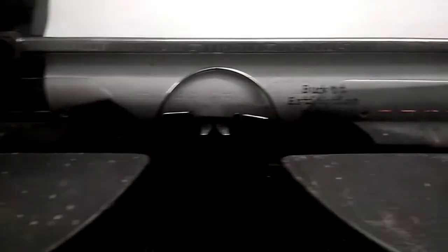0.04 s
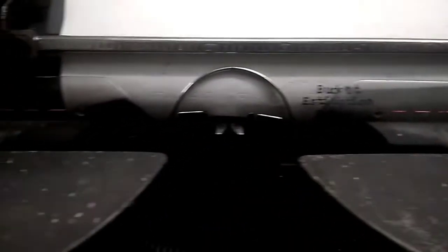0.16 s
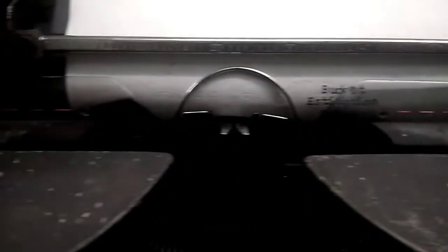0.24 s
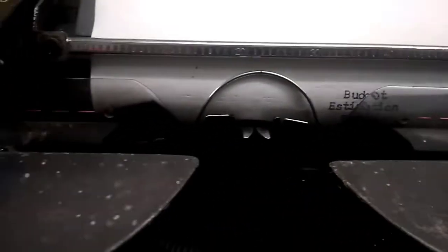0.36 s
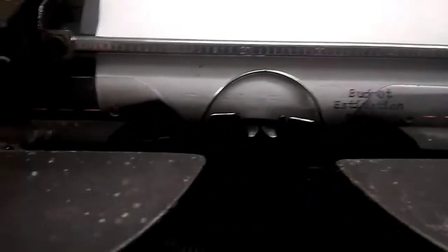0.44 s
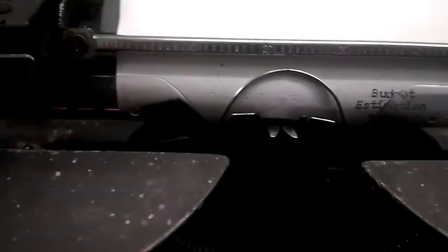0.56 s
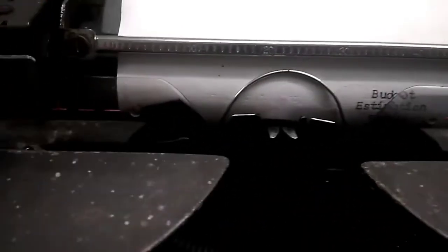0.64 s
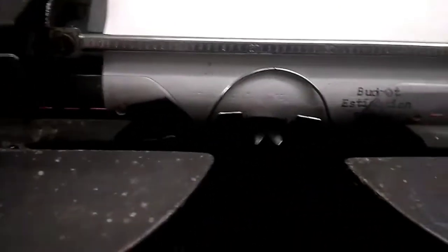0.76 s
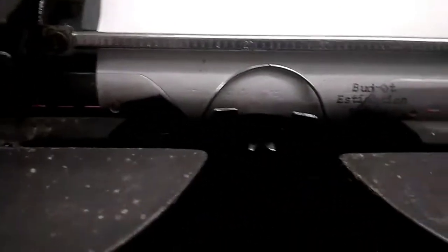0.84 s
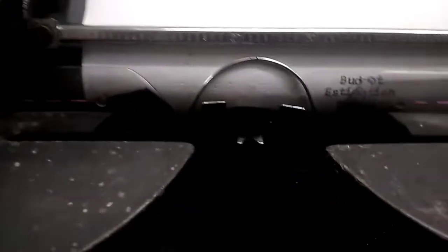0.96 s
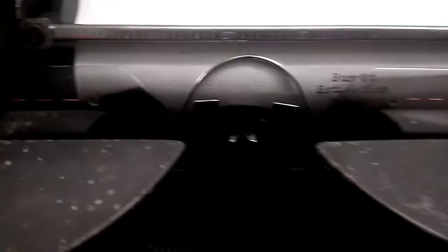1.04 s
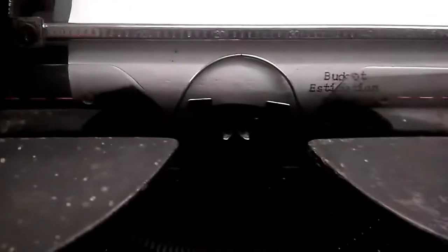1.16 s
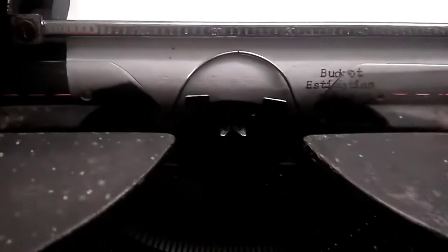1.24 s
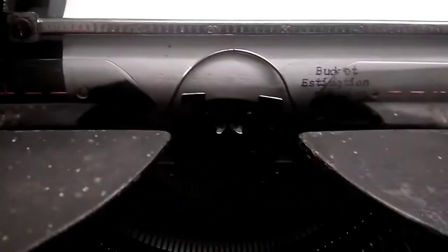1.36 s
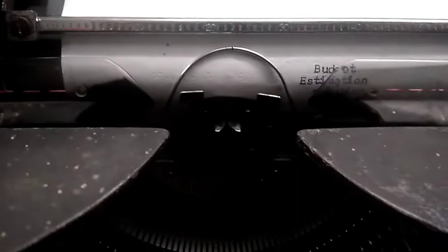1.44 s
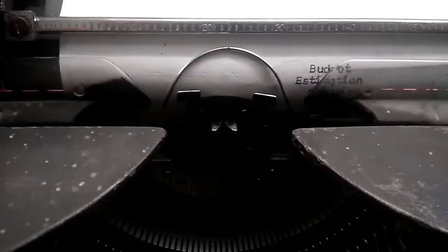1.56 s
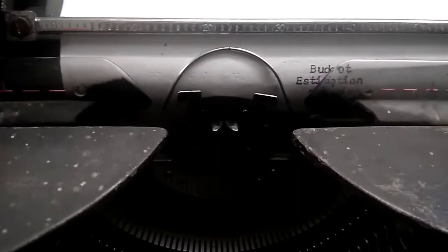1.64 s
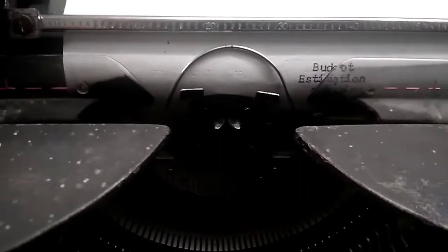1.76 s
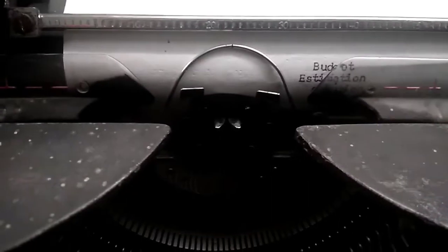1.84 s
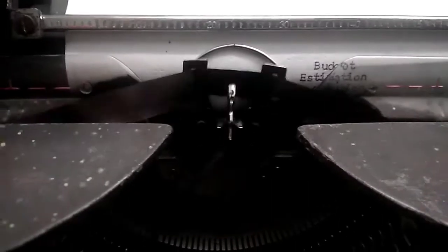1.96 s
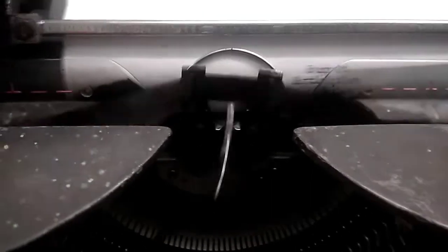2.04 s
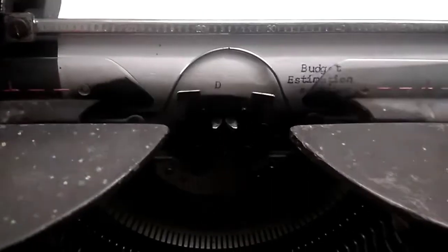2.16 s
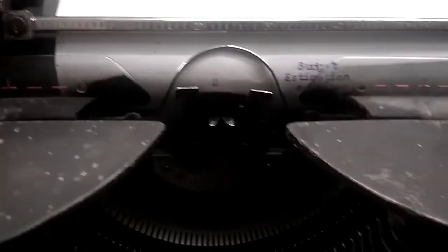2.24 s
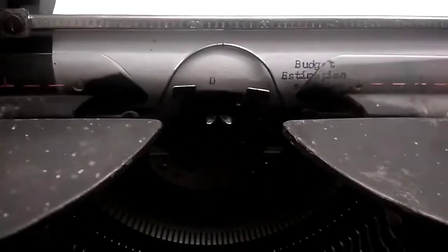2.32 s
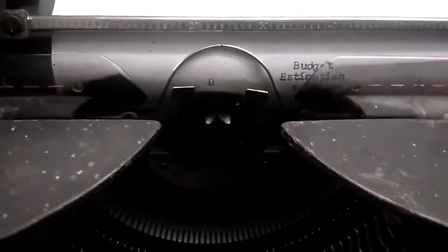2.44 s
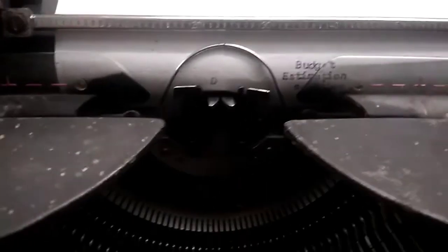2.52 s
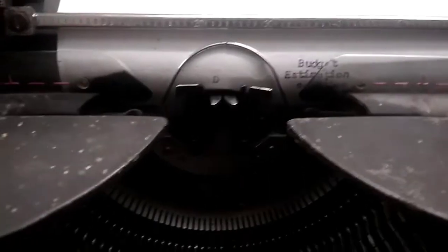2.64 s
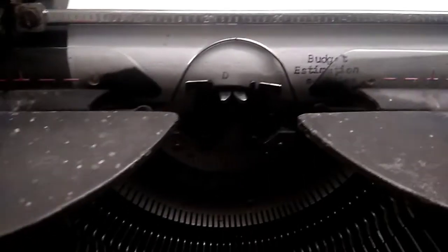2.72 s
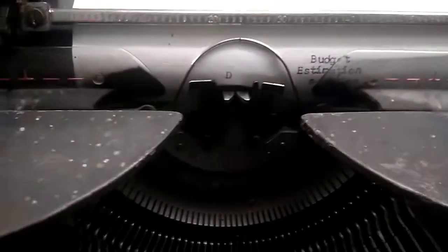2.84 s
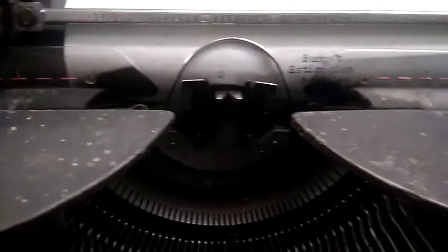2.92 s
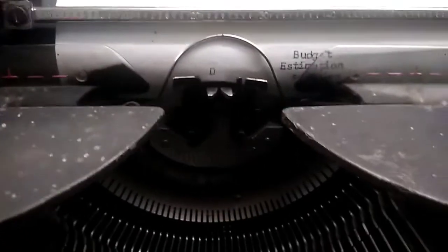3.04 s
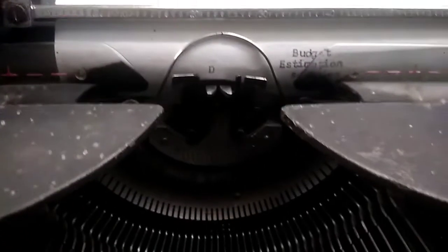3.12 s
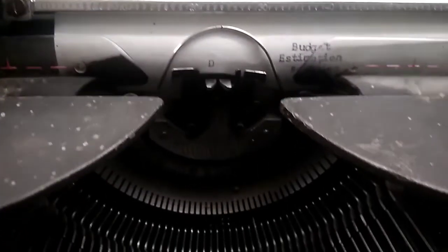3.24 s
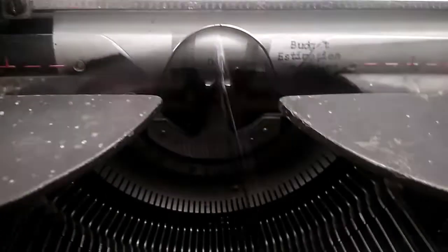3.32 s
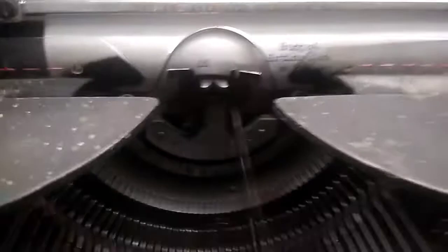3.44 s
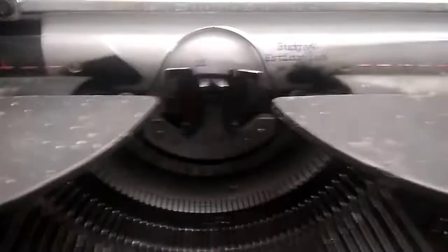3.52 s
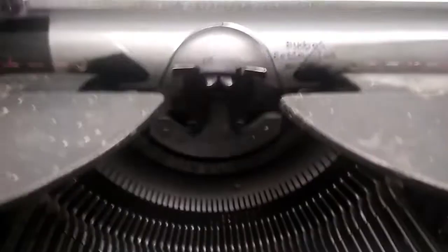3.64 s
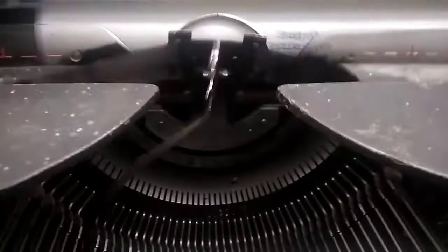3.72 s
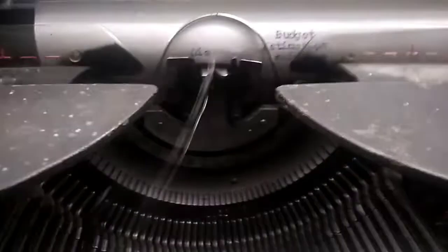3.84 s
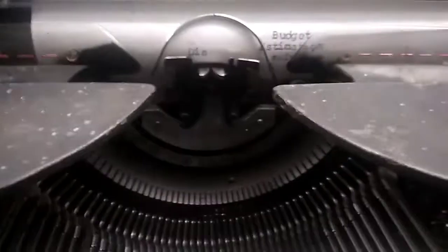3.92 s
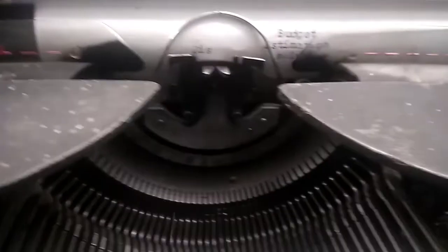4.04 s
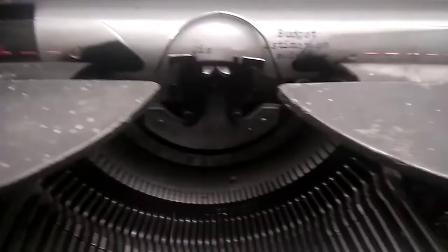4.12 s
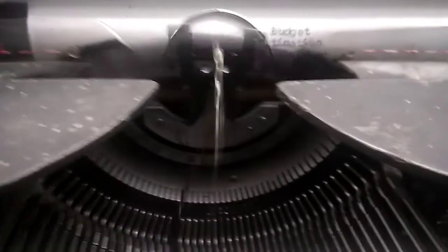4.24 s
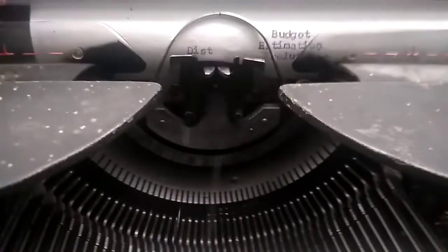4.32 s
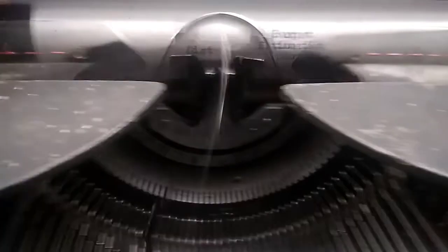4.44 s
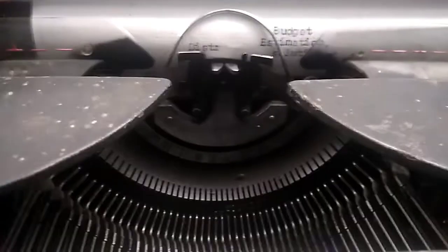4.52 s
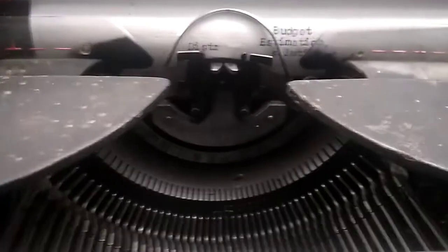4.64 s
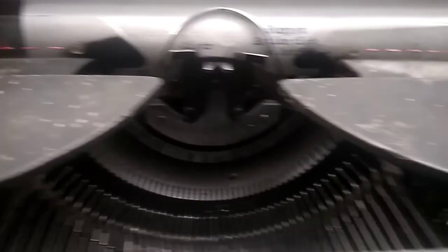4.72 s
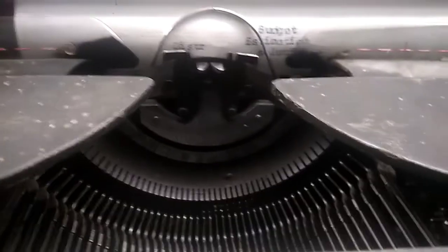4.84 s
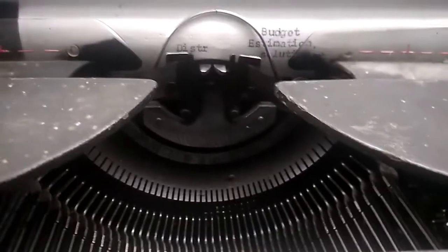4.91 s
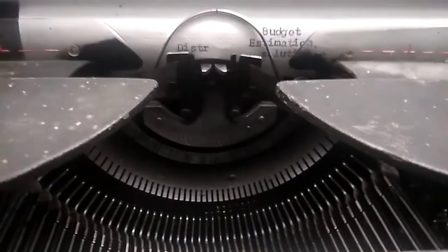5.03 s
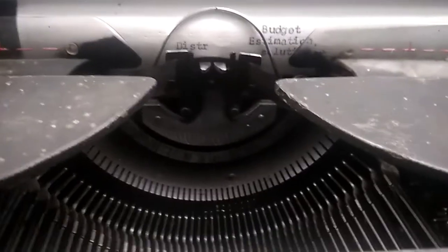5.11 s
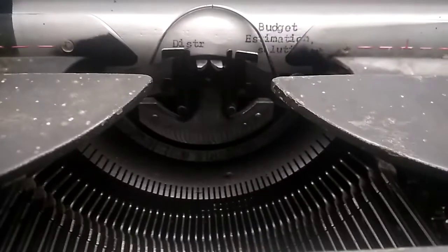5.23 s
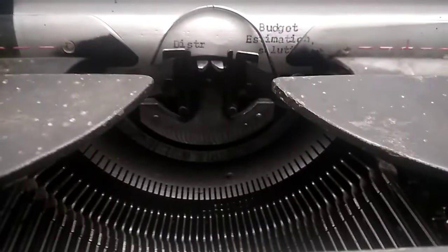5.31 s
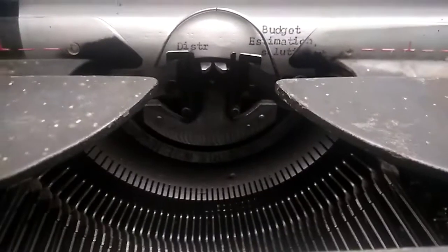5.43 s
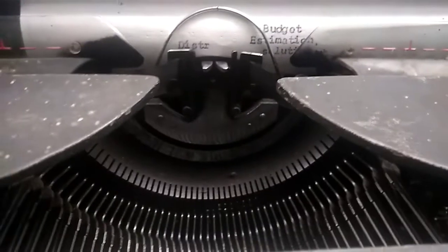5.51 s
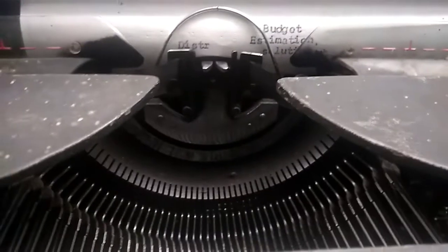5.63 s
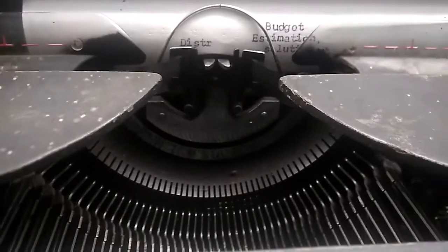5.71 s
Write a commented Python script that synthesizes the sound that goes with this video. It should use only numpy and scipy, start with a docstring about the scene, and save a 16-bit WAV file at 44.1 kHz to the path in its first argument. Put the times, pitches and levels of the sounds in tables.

```python
"""A manual typewriter on a desk in a quiet room, the microphones close by. Ventilation hums softly from the
left throughout, with faint far hums and knocks. The shift key clunks down, one letter is struck, the shift key
clunks up, then four letters follow faster. For each letter the linkage rattles, the typebar slaps the platen,
the carriage steps with a thud through frame and desk, and the bar drops back. Chatter is shaped noise, the
struck bodies are decaying modes, and the room answers briefly; a last low ring lingers."""
import sys
import numpy as np
from scipy import signal
from scipy.fft import rfft, irfft, next_fast_len
from scipy.io import wavfile
from scipy.ndimage import uniform_filter1d, map_coordinates

SR = 44100
rng = np.random.default_rng(int(sys.argv[2]) if len(sys.argv) > 2 else 0)


def persist_wave(psi):
    """Save psi, clipped to +-1, as 16-bit WAV."""
    counts = np.round(np.clip(psi, -1, 1) * 32767).astype(np.int16)
    wavfile.write(sys.argv[1], SR, np.atleast_2d(counts).T)


N = 254456

# letters: [slug on the platen t/s, slap level/dB, left re right/dB, overload re slap/dB,
#  bar enters the guide t/s, level/dB, chatter at the slap level/dB, its t60/ms,
#  bar rebounds t/s, level/dB, blow to the frame at the slap/dB, at the rebound/dB]
LETTERS = [(1.9873, -14, 6.5, -7, 1.9779, -14.5, -12, 24, 2.01, -17, -22.5, -33),
           (3.4171, -5, 4.5, -24, 3.408, -14, -13.5, 19, 3.4372, -17, -29, -27),
           (3.805, -4.5, 1.5, -29.5, 3.794, -18, -14, 15, 3.8267, -19, -37, -27),
           (4.243, -9, -0.5, -26, 4.2315, -18, -15, 30, 4.2622, -16.5, -36, -27),
           (4.48, -7.5, 0, -26.5, 4.468, -19, -15.5, 45, 4.503, -20, -40, -24)]
# carriage steps as a key is let go: [t/s, blow level/dB, click level/dB,
#  settling blow t/s, level/dB, bounce on the feet re blow/dB]
CARRIAGE_STEPS = [(2.18, -25.5, -31, 2.219, -29, -18), (3.487, -23.5, -34, 3.52, -29, -12),
                  (3.874, -23, -33, 3.919, -34, -10.5), (4.312, -23.5, -28, 4.339, -30.5, -11),
                  (4.55, -23, -27, 4.574, -27, -12.5)]
# typebar back in its basket: [first touch t/s, level/dB, landing t/s, level/dB]
BAR_RETURNS = [(2.2464, -18.5, 2.2601, -9.5), (3.5689, -18, 3.5758, -7.5), (3.9642, -19.5, 3.9764, -11),
               (4.3987, -20, 4.4021, -14), (4.5533, -20, 4.573, -12.5)]


def linkage():
    """Every contact is a short chatter of tiny steel impacts, bright with a duller part; loose parts rustle between."""
    # bright part of the contacts: [f/Hz, level/dB]
    bright_spectrum = [(1760, -39), (3000, -20), (3400, -24.5), (3830, -14), (4110, -17), (5750, -6.5),
                       (6860, -9.5), (8700, -2.5), (9660, -0.5), (10100, -4.5), (11000, -10.5),
                       (14200, -12.5), (16000, -22)]
    # dull part of the contacts: [f/Hz, level/dB]
    dull_spectrum = [(300, -43.5), (700, -9.5), (1100, -4.5), (1500, -3), (2300, -1.5), (3200, -4.5),
                     (4500, -10.5), (8000, -34)]
    # resonances of the steel levers: [f/Hz, width/Hz, level/dB]
    lever_modes = [(5450, 110, -11.5), (8580, 41, -4.5), (8860, 50, -1), (9850, 630, -5.5),
                   (10740, 200, -1.5), (11500, 280, -7), (12300, 93, -5), (13800, 39, -10.5)]
    pan_scatter_db = 2

    time = np.arange(N) / SR
    grit_db = 2 * wobble(40) + 4 * np.maximum(wobble(300), 0)  # lumps and ticks
    bright, dull = (np.tile(level * amp(grit_db - 1), (2, 1)) for level in rustle())
    t = time[:SR // 4]
    for s, db, dull_db, rise_ms, t60_ms in contacts():
        pan_db = pan_scatter_db * rng.standard_normal()
        pan_pair_db = np.array([[pan_db], [-pan_db]]) / 2
        shape = fade(t, t60_ms / 1000, max(rise_ms, .1) / 1000)
        shape = amp(db - 7.5 + pan_pair_db) * shape / shape.max()
        add(bright, s, shape)
        add(dull, s, amp(dull_db) * shape)

    # other small parts take the blows from moment to moment, so the fine colour keeps changing
    steel = patchy(hiss(bright_spectrum, [(5000, .05)]), depth_db=3.0, size=3, span=3)
    body = patchy(hiss(dull_spectrum, [(600, .4), (1400, -0.14), (4000, -0.036)]), depth_db=4, size=3, span=3)
    flicker = amp(2.17 * np.array([wobble(700), wobble(700)]))
    chatter = flicker * bright * steel

    def levers(f):
        """A direct path plus one resonance for each lever mode."""
        return 0.91 + sum(amp(db) * 1j * f * w / (c * c - f * f + 1j * f * w) for c, w, db in lever_modes)

    return filtered(chatter, levers) + dull * body


def contacts():
    """Steel meets steel with a hardness and chatter of its kind: [t/s, level/dB, duller part/dB, rise/ms, t60/ms]."""
    # small ticks of key levers and bouncing bars: [t/s, level/dB, t60/ms]
    lever_ticks = [(0.7978, -43, 39), (0.811, -30, 15), (1.918, -33, 80), (1.941, -34, 28),
                   (1.961, -30.5, 150), (2.1658, -43, 130), (2.2104, -22, 60), (2.3256, -23.5, 19),
                   (3.3563, -33.5, 57), (3.368, -35.5, 74), (3.3787, -31, 38), (3.7295, -27, 35),
                   (3.7448, -22, 25), (3.7575, -27.5, 60), (3.786, -34, 60), (4.0709, -18.5, 14),
                   (4.0994, -38, 30), (4.1773, -35, 31), (4.1981, -31, 56), (4.221, -28, 25),
                   (4.227, -26, 30), (4.372, -24, 30), (4.46, -30, 20)]
    # clatter of the shift key, down and up: [t/s, level/dB, duller part re level/dB]
    shift_clatter = [(0.9303, -28.5, -2), (0.9383, -22.5, -3), (0.948, -25.5, -5.5), (0.957, -30, -3),
                     (2.607, -23, -16.5), (2.6115, -19.5, -13.5), (2.6227, -22, -11), (2.6294, -21, -3.5),
                     (2.638, -27, 1), (2.648, -29, 2.5)]
    # each kind: duller part in dB, rise in ms, t60 in ms (the slap's t60 comes with its letter)
    guide, slap, rebound = (-9, 1.8, 48), (6, .7), (-5, 1.1, 38)
    pawl, touch, land = (-4, 1.5, 45), (-13, 1.6, 45), (-11, .6, 16)
    tick_dull_db, tick_rise_ms = -16, 1.3
    shift_rise_ms, shift_t60_ms = .9, 38

    rows = [(s, db, tick_dull_db, tick_rise_ms, t60_ms) for s, db, t60_ms in lever_ticks]
    rows += [(s, db, dull_db, shift_rise_ms, shift_t60_ms) for s, db, dull_db in shift_clatter]
    for s, _, _, _, guide_s, guide_db, chatter_db, t60_ms, back_s, back_db, *_ in LETTERS:
        rows.append((guide_s, guide_db, *guide))
        rows.append((s - .001, chatter_db, *slap, t60_ms))
        rows.append((back_s, back_db, *rebound))
    rows += [(s, click_db, *pawl) for s, _, click_db, *_ in CARRIAGE_STEPS]
    for s, db, land_s, land_db in BAR_RETURNS:
        rows += [(s, db, *touch), (land_s, land_db, *land)]
    return rows


def rustle():
    """Bright and dull envelopes of loose parts, shaken anew by each swing, slap, step and landing; powers add."""
    # bright dB, dull dB, rise s, bright t60 s, dull t60 s
    after_slap = (-38.5, -39, .012, .8, .38)
    after_step = (-39, -36, .015, .45, .28)
    after_land = (-47, -58, .012, .42, .2)
    swing_db = np.array([[-36], [-48]])  # bright and dull, as the bar reaches the guide
    swing_db_per_s = 1300  # the bar's rattle grows on its way up
    settle_t60_s = .12  # what the slap shook comes to rest once the bar has landed

    power, t = np.zeros((2, N)), np.arange(SR // 2) / SR

    def shake(bright_db, dull_db, rise, bright_t60, dull_t60):
        """Loose parts set going by one blow."""
        return np.array([amp(bright_db) * fade(t, bright_t60, rise), amp(dull_db) * fade(t, dull_t60, rise)])

    before = t[:SR // 16][::-1]  # seconds left until the guide
    for letter, step, fall in zip(LETTERS, CARRIAGE_STEPS, BAR_RETURNS):
        slap_s, guide_s, step_s, land_s = letter[0], letter[4], step[0], fall[2]
        add(power, guide_s - before[0], amp(swing_db - swing_db_per_s * before) ** 2)
        rest = amp(-60 * np.maximum(slap_s + t - land_s, 0) / settle_t60_s)
        add(power, slap_s, (rest * shake(*after_slap)) ** 2)
        add(power, step_s, shake(*after_step) ** 2)
        add(power, land_s, shake(*after_land) ** 2)
    return np.sqrt(power)


def platen():
    """The slug's slap rings roller and paper; the right microphone overloads at the slap, leaving a slow low step."""
    # roller and paper modes: [f/Hz, level/dB, t60/s]
    roller_modes = [(675, -6, 0.054), (936, -1.5, .03), (1439, -6.5, 0.026), (1640, -4.5, 0.018),
                    (1818, -2, 0.041), (2180, -3.5, 0.014), (2390, -3, 0.071), (2970, -3.5, 0.025),
                    (3180, -2.5, 0.037), (3517, -2.5, 0.03)]
    out, t = np.zeros((2, N)), np.arange(SR // 6) / SR
    u = 2 * np.pi * 2500 * t
    # one swing each way, partly opposed at the two microphones
    slap = 7 * (1 - u) * np.exp(-u) * np.array([[1], [-.4]])
    for s, db, pan_db, overload_db, *_ in LETTERS:
        pan_pair_db = np.array([[pan_db], [-pan_db]]) / 2
        body = ring(roller_modes, t, .0003, scatter_db=1.5, turns_per_khz=.3)
        add(out, s, amp(db - 12.5 + pan_pair_db) * (body + slap))
        overload = fade(t, .12, rise=.0008) * np.cos(2 * np.pi * 14 * t)
        add(out[1], s, -amp(db + overload_db) * overload)
    return out


def carriage():
    """Soft heavy blows ring the frame, the feet and the desk and give a dull puff."""
    # typewriter frame: [f/Hz, level/dB, t60/s]
    frame_modes = [(321.5, -5, 0.15), (359.1, 3, 0.14), (422, -5, .15), (560, -5.5, 0.069),
                   (689.4, -4.5, 0.13)]
    # the machine bouncing on its feet: [f/Hz, level/dB, t60/s]
    feet_modes = [(120.4, 1, 0.21)]
    # desk under it: [f/Hz, level/dB, t60/s]
    desk_modes = [(62, -8.5, 0.13), (96, 3, .22), (163, 0, .2), (210, -5.5, .15), (265, -1.5, 0.12)]
    # dull puff: [f/Hz, level/dB]
    puff_spectrum = [(12, -40), (30, -19.5), (70, -4.5), (200, -4), (500, -3.5), (800, -7.5), (1300, -15.5),
                     (3000, -45.5)]
    out, puff, t = np.zeros((2, N)), np.zeros(N), np.arange(SR // 4) / SR
    for s, db, feet_db, desk_db, puff_db in blows():
        frame = ring(frame_modes, t, .003, scatter_db=2, turns_per_khz=.2)
        feet = ring(feet_modes, t, .008, scatter_db=0.65, turns_per_khz=.3)
        desk = ring(desk_modes, t, .003, scatter_db=1.5, turns_per_khz=.4)
        add(out, s, amp(db - 6) * (frame + amp(feet_db + 11.5) * feet + amp(desk_db + 8) * desk))
        add(puff, s, amp(db + puff_db - 3.5) * fade(t, 0.079, rise=.002))
    out += puff * hiss(puff_spectrum, [(25, .3), (80, 1.0), (800, .5)])
    return out * amp([[2.2], [-2.2]])  # heavier on the left


def blows():
    """Each heavy blow shares its force among the bodies: [t/s, frame level/dB, feet, desk, puff re frame/dB]."""
    # heavy blows of the shift key: [t/s, frame level/dB, desk re frame/dB]
    shift_blows = [(0.932, -31, -2), (0.955, -34, 0), (1.004, -41.5, -4), (2.631, -29.5, -4),
                   (2.659, -38.5, -3)]
    # the desk rocks: [t/s, frame level/dB]
    desk_rocks = [(1.063, -46), (1.154, -55), (2.355, -48), (2.749, -49), (2.839, -52), (4.741, -55)]
    # feet, desk and puff in dB re frame
    at_slap, at_rebound = (-30, -24, 3), (-20, -21, -8)
    at_land, at_rock = (-13, -13, -3), (-5, 1.5, -5)
    at_step, at_settle = (-25, -2), (-17.5, -2)  # desk and puff only
    shift_feet_db, shift_puff_db = -7, -1
    settle_feet_db = 3  # the settling blow bounces the feet more
    land_blow_db = -36

    rows = [(s, db, shift_feet_db, desk_db, shift_puff_db) for s, db, desk_db in shift_blows]
    rows += [(s, db, *at_rock) for s, db in desk_rocks]
    for s, *_, back_s, _, slap_db, back_db in LETTERS:
        rows += [(s, slap_db, *at_slap), (back_s, back_db, *at_rebound)]
    for s, db, _, settle_s, settle_db, feet_db in CARRIAGE_STEPS:
        rows.append((s, db, feet_db, *at_step))
        rows.append((settle_s, settle_db, feet_db + settle_feet_db, *at_settle))
    return rows + [(land_s, land_blow_db, *at_land) for _, _, land_s, _ in BAR_RETURNS]


def room(x):
    """Each frequency dies at its own speed; the tail differs from moment to moment."""
    # reverberation: [f/Hz, t60/s]
    room_t60 = [(100, 0.62), (500, 0.24), (3000, 0.28), (9000, 0.32), (15000, 0.27)]
    out, step = np.zeros((2, N)), SR // 5  # a new tail every 0.2 s
    for k in range(0, N, step):
        hz, t, z = signal.stft(rng.standard_normal((2, SR // 2)), SR, nperseg=256)
        decay = amp(-60 * t / along(room_t60, hz)[:, None])
        tail = signal.istft(z * decay, SR, nperseg=256)[1]
        tail = tail / np.linalg.norm(tail[0])
        add(out, k / SR + .004, signal.fftconvolve(x[:, k:k + step], tail, axes=1))
    return out


def room_tone():
    """Patchy ventilation noise over smooth microphone hiss, with decaying low tones and far knocks."""
    # ventilation: [f/Hz, level/dB]
    air_spectrum = [(12, -42.5), (20, -11.5), (91, -1.5), (134, -18), (170, -1.5), (256, -4), (279, -13.5),
                    (459, -8.5), (558, -10), (878, -6), (1040, -17.5), (1140, -9.5), (1610, -17.5),
                    (2320, -18), (3500, -31.5), (4550, -61), (7700, -120)]
    # ventilation over time: [t/s, level/dB]
    air_level = [(0.0, -55.5), (2.0, -58.5), (3.6, -56), (5.77, -58)]
    # microphone hiss: [f/Hz, level/dB]
    mic_spectrum = [(1760, -31.5), (3000, 0), (3150, -3), (5750, -9), (9530, -1.5), (12500, -15),
                    (15100, -17.5), (16000, -23.5)]
    # likeness of left and right: [f/Hz, correlation]
    air_likeness = [(60, 0.94), (240, 0.84), (950, 0.48), (3770, -0.1), (15000, -0.01)]
    # lean to the left: [f/Hz, left re right/dB]
    left_lean = [(60, 5.5), (380, 5.5), (2380, 2.5), (15000, 5.5)]
    # low hums in the building, and a long low ring after the last letter: [t/s, level/dB, f/Hz, t60/s]
    low_tones = [(0.03, -47, 250, 0.11), (0.109, -43.5, 196, 0.12), (0.549, -45.5, 168, 0.22),
                 (0.611, -46.5, 200, 0.14), (0.67, -47, 185, 0.12), (0.741, -45.5, 198, 0.1),
                 (4.78, -53.5, 212, 2.4)]
    # faint far knocks: [t/s, level/dB]
    far_knocks = [(0.222, -46), (3.052, -52)]
    # what a knock rings: [f/Hz, level/dB, t60/s]
    knock_modes = [(740, 0.5, .1), (874, -0.5, .1), (1296, -3.5, .09), (1470, -6, .09)]

    s, db = np.transpose(air_level)
    level = amp(np.interp(np.arange(N) / SR, s, db))
    air = level * patchy(hiss(air_spectrum, air_likeness), depth_db=2.5, size=4, span=6)
    air += amp(-70) * hiss(mic_spectrum, air_likeness)
    t = np.arange(SR) / SR
    for s, db, hz, t60 in low_tones:
        add(air, s, amp(db) * fade(t, t60, rise=0.0063) * np.sin(2 * np.pi * hz * t))
    for s, db in far_knocks:
        add(air, s, amp(db) * ring(knock_modes, t, .006, scatter_db=1.5, turns_per_khz=.1))
    return filtered(air, lambda hz: amp(along(left_lean, hz) * np.array([[.5], [-.5]])))


def ring(modes, t, rise, scatter_db, turns_per_khz):
    """Modes at new strengths; higher modes reach the two microphones more out of step."""
    draw = rng.standard_normal((len(modes), 3))  # strength, left phase, right phase
    out = 0
    for (hz, db, t60), d in zip(modes, draw):
        turns = hz * t + turns_per_khz * hz / 1000 * d[1:, None]
        out = out + amp(db + scatter_db * d[0]) * fade(t, t60, rise) * np.sin(2 * np.pi * turns)
    return out


def hiss(spectrum, alike):
    """Stereo noise of rms 1 with a given likeness of the channels, set by the balance of mid and side."""
    turn = lambda hz: np.arccos(np.clip(along(alike, hz), -1, 1)) / 2
    white = rng.standard_normal((2, N))
    mid, side = filtered(white, lambda hz: amp(along(spectrum, hz)) * [np.cos(turn(hz)), np.sin(turn(hz))])
    return unit(np.array([mid + side, mid - side]))


def patchy(x, depth_db, size, span):
    """Random gain patches smoothed over size bins and span frames, the same in both channels; rms 1."""
    z = signal.stft(x, SR, nperseg=1024)[2]
    field = uniform_filter1d(rng.standard_normal(z.shape[1:]), size=size, axis=0)
    field = uniform_filter1d(field, size=span, axis=1)
    return unit(signal.istft(z * amp(depth_db * unit(field)), SR, nperseg=1024)[1][:, :N])


def wobble(rate):
    """A smooth random curve, rate knots a second."""
    knots = rng.standard_normal(int(N * rate / SR) + 4)
    return map_coordinates(knots, [np.arange(N) * rate / SR])


def fade(t, t60, rise):
    """Quick rise, exponential fall."""
    return amp(-60 * t / max(t60, .004)) * (1 - np.exp(-t / rise))


def filtered(x, response):
    """x times a response of frequency."""
    m = next_fast_len(N + SR // 2)
    return irfft(rfft(x, m) * response(np.fft.rfftfreq(m, 1 / SR)), m)[..., :N]


def along(points, hz):
    """Interpolates (Hz, value) points on a log axis."""
    f, v = np.transpose(points)
    return np.interp(np.log(hz + 1), np.log(f + 1), v)


def add(out, s, sound):
    """Mixes a sound in at a time in seconds."""
    part = out[..., round(s * SR):][..., :sound.shape[-1]]
    part += sound[..., :part.shape[-1]]


def amp(db):
    """Decibels to amplitude."""
    return 10 ** (np.asarray(db) / 20)


def unit(x):
    """Scales to rms 1."""
    return x / np.sqrt(np.mean(x ** 2) + 1e-20)


def scene():
    """The typewriter's direct sound, the room's answer to it above 70 Hz, and the room tone."""
    sharp = linkage() + platen()
    heavy = carriage()
    wet = filtered(amp(-8) * sharp + amp(-10.5) * heavy, lambda hz: hz > 70)
    return sharp + heavy + room(wet) + room_tone()


def record(dry):
    """The loudest peaks round off just below full scale; nothing is kept above the band limit."""
    top_hz = 16000
    rounded = dry / (1 + np.abs(dry / .97) ** 8) ** (1 / 8)
    return filtered(rounded, lambda hz: hz < top_hz)


dry = scene()
out = record(dry)
persist_wave(out)
```